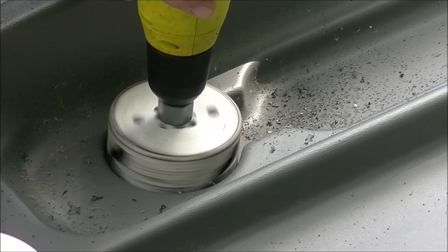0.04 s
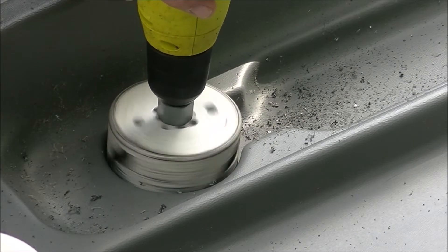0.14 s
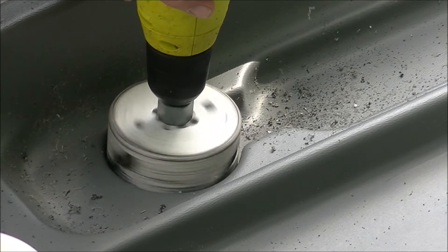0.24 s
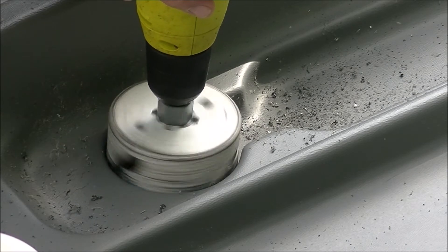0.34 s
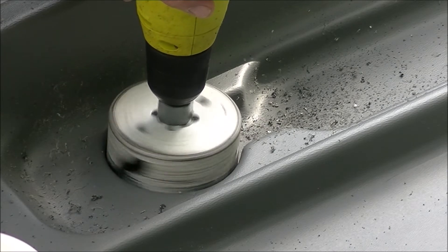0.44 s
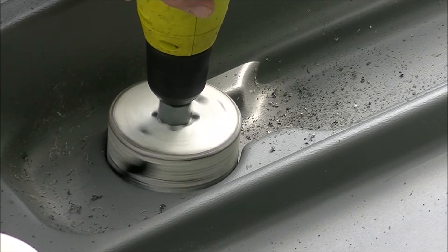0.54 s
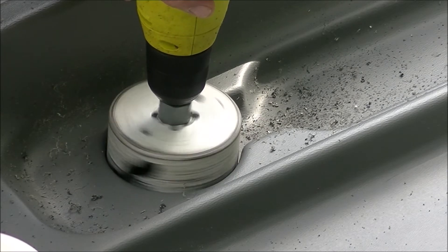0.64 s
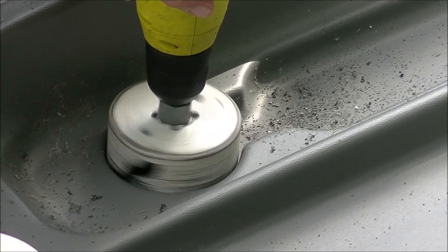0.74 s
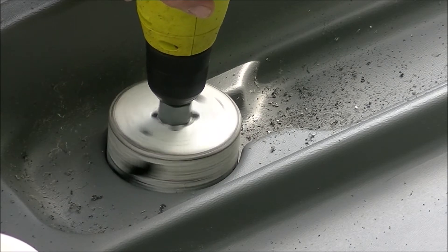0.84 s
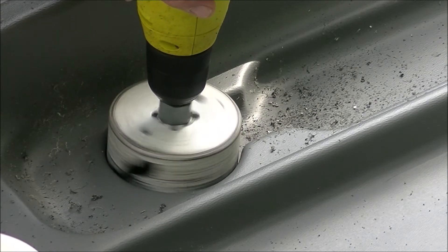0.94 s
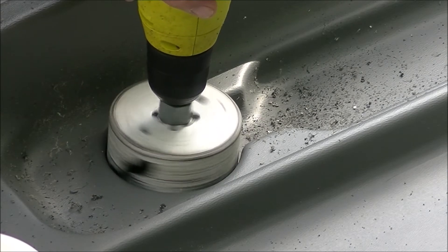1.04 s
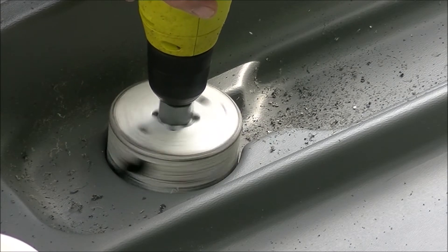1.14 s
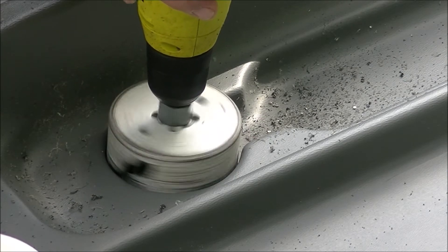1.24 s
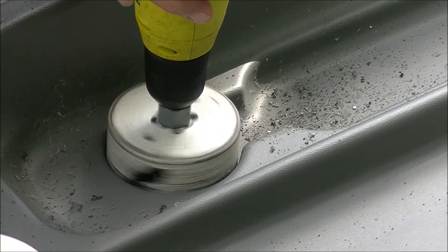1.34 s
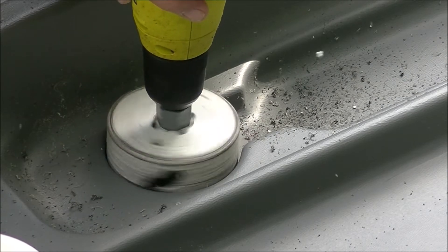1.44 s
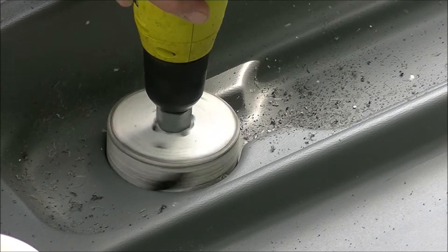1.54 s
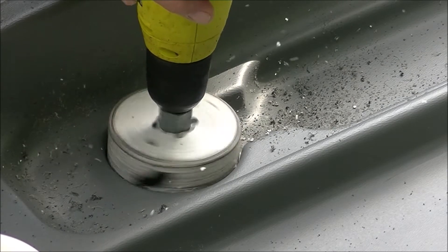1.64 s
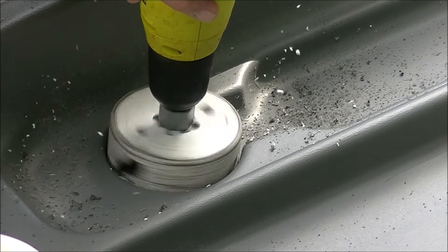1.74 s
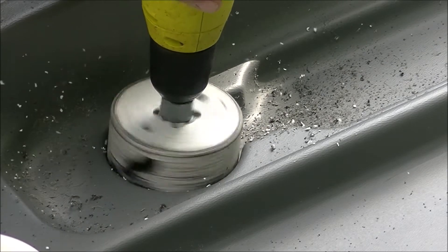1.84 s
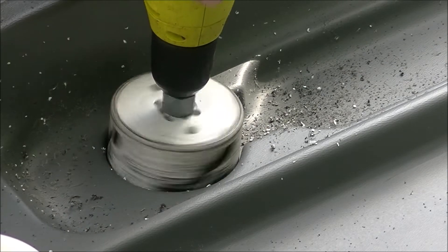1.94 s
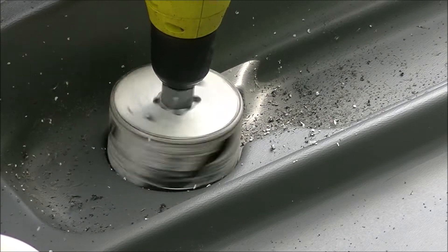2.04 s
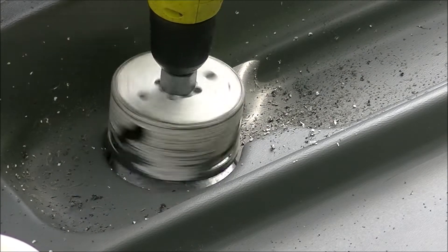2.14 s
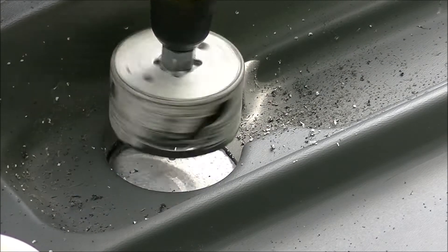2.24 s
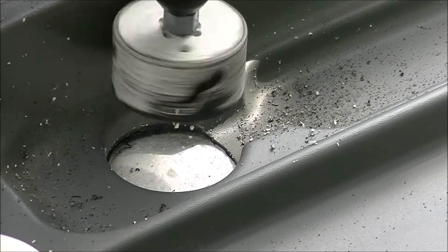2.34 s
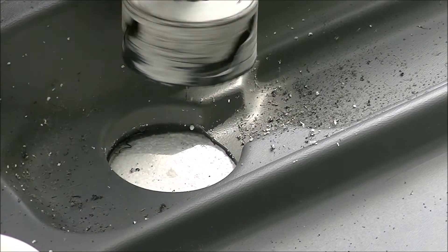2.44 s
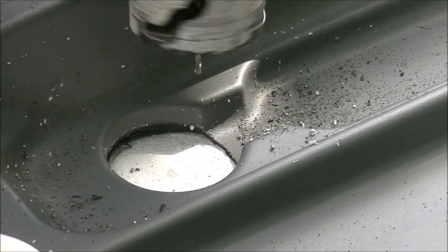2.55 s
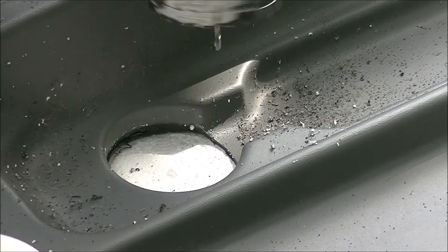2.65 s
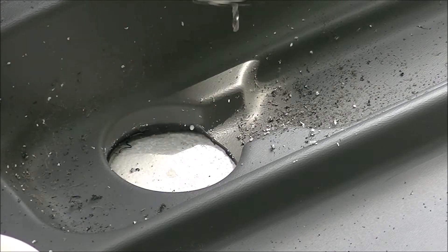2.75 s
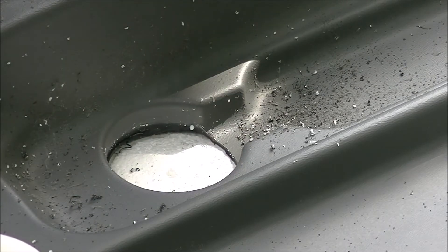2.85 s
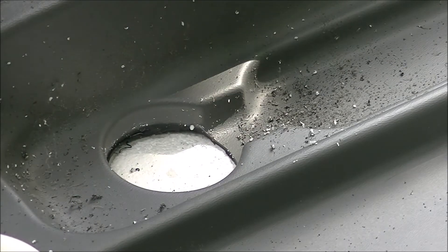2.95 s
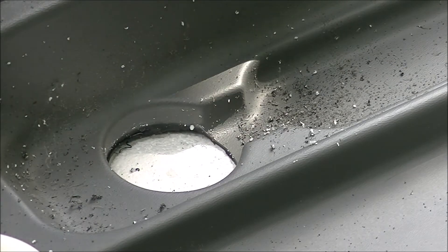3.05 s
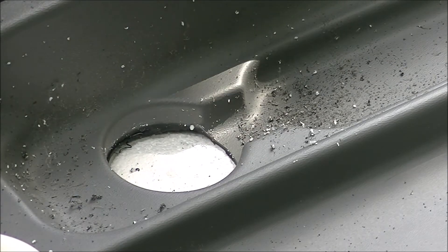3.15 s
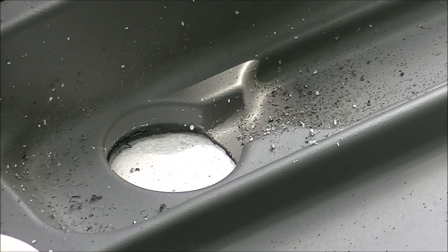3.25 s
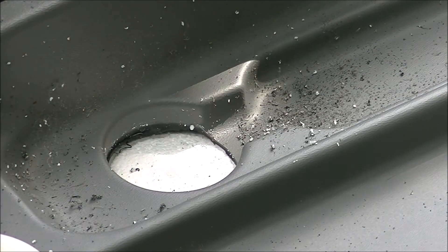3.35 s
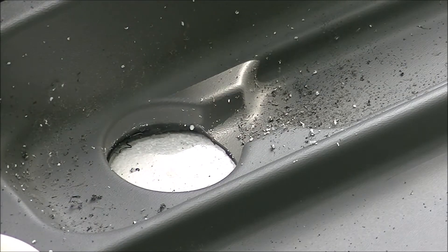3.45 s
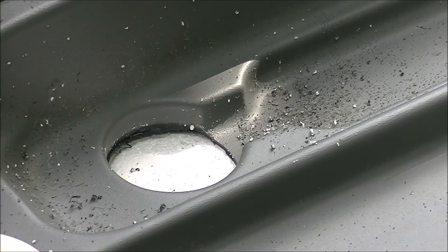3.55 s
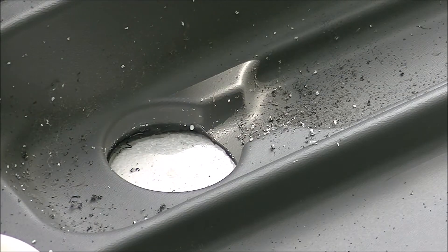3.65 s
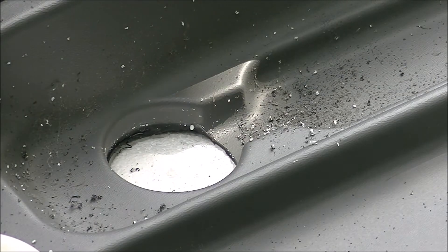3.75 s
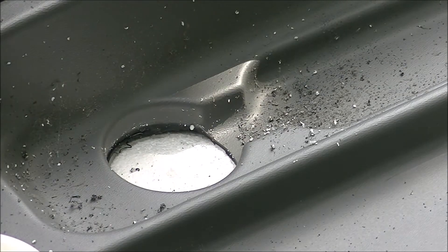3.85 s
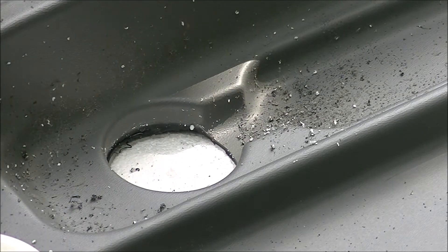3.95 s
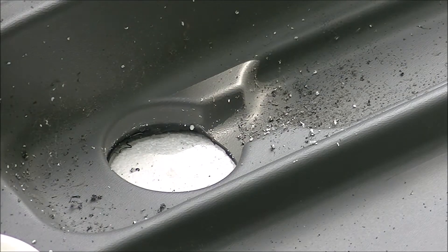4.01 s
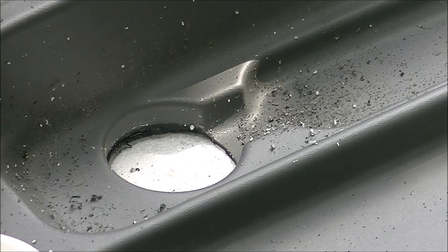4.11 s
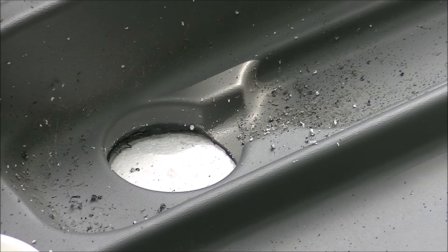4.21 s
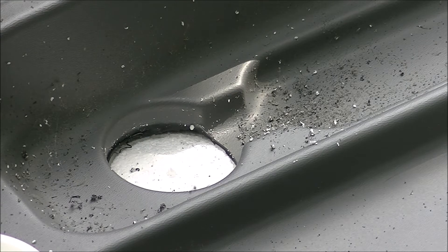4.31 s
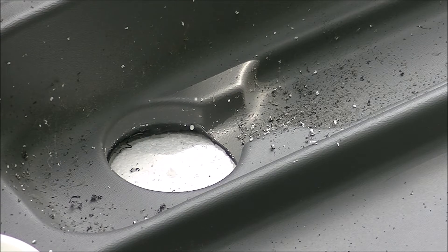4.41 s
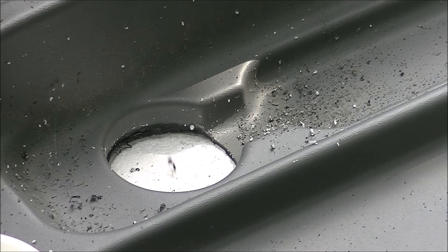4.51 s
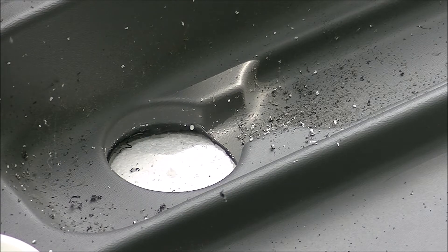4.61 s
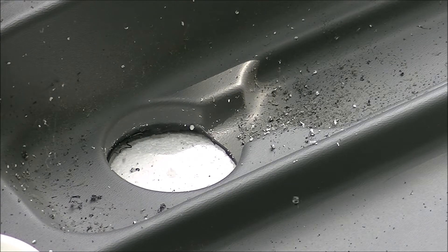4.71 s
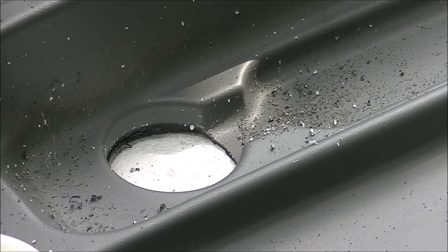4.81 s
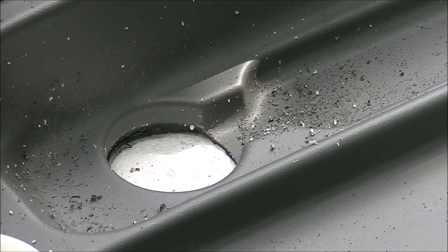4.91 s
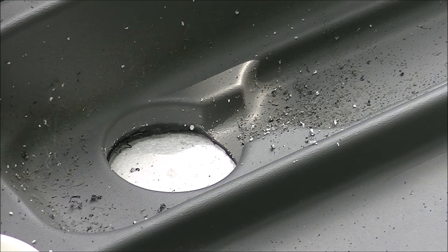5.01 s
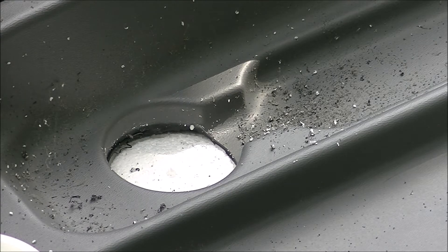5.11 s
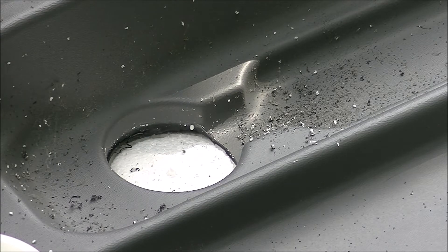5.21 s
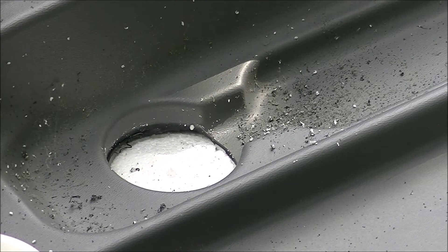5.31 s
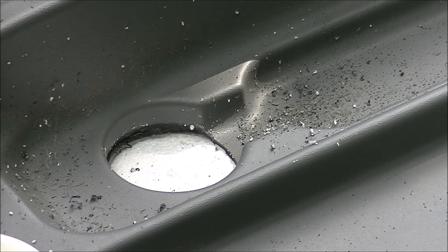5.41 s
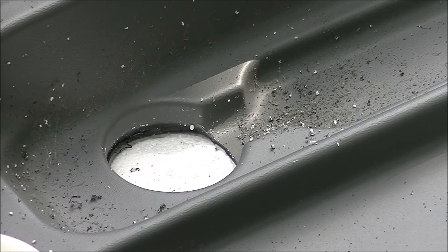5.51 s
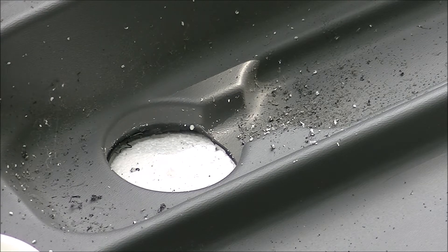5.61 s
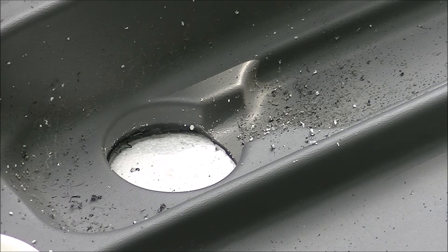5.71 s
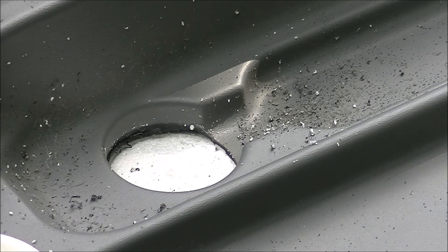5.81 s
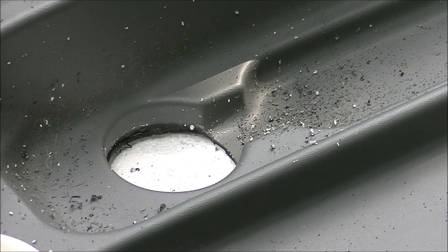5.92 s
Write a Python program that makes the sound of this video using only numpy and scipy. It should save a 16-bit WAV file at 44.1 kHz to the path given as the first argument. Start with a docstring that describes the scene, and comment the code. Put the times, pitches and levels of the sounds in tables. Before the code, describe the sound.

Rough, rhythmic hole-saw cutting in a plastic deck, a gliding motor wind-down, then small tool clatters and dull knocks outdoors.

```python
"""Hole saw in a plastic deck

Outdoors, a mains drill close to two microphones turns a hole saw in a hollow plastic deck, insects far behind.
Noise coloured by the housing and tones locked to the motor make the drill; a bite pattern that nearly repeats
each turn makes the saw. It breaks through, the trigger is let go, the saw is lifted out and the motor coasts
to a stop. Short damped partials make the snags on the rim and the clicks and bumps as the tool is put down."""
import sys
import numpy as np
from scipy import signal
from scipy.fft import rfft, irfft, next_fast_len
from scipy.io import wavfile
from scipy.ndimage import uniform_filter1d

SR = 44100
rng = np.random.default_rng(int(sys.argv[2]) if len(sys.argv) > 2 else 0)


def generate_wav(signal):
    """Clip the signal to [-1, 1] and save it as 16-bit WAV at the path in sys.argv[1]."""
    frames = np.transpose(np.atleast_2d(signal))
    scaled = np.clip(frames, -1, 1) * 32767
    pcm = np.round(scaled).astype(np.int16)
    wavfile.write(sys.argv[1], SR, pcm)


N = 263260
T = np.arange(N) / SR
M = next_fast_len(N + SR)   # padded FFT length
CUTOFF_HZ = 15676
BREAKTHROUGH_S, TRIGGER_OFF_S = 1.37, 1.75
FULL_SPEED = 420   # motor turns per s
GEAR_DOWN = 21   # motor turns per saw turn


def from_db(db):
    """Decibels to amplitude."""
    return 10 ** (np.asarray(db) / 20)


def rms_one(x):
    """Scale to an rms of 1."""
    return x / np.sqrt(np.mean(x ** 2) + 1e-20)


def in_time(rows):
    """Columns after the first as curves in time."""
    s, *columns = np.transpose(rows)
    return [np.interp(T, s, c) for c in columns]


def sounding(rows, fade_s=0.028):
    """One until the last row, then a short fade."""
    return np.clip(1 - (T - rows[-1][0]) / fade_s, 0, 1)


def at_hz(points):
    """A table read on the FFT grid, along log frequency."""
    hz, value = np.transpose(points)
    grid_hz = np.fft.rfftfreq(M, 1 / SR)
    return np.interp(np.log(grid_hz + 1), np.log(hz), value)


def colour(x, spectrum):
    """Filter to a spectrum; rms 1."""
    return rms_one(irfft(rfft(x, M) * from_db(at_hz(spectrum)), M)[:N])


def noise(spectrum):
    """Steady noise of a given colour; rms 1."""
    return colour(rng.standard_normal(N), spectrum)


def drift(rate_hz):
    """Slow chance made at every 40th sample by a double pole, spread 1."""
    r = np.exp(-80 * np.pi * rate_hz / SR)
    chance = rng.standard_normal(N // 40 + 1002)
    slow = signal.lfilter([1], [1, -2 * r, r * r], chance)[1000:]   # drop the filter's start
    return np.interp(np.arange(N) / 40, np.arange(len(slow)), rms_one(slow))


def octaves(speed):
    """Speed in octaves from full speed."""
    return np.log2(np.maximum(speed, 1) / FULL_SPEED)


# colour of the far insect chorus: (frequency [Hz], relative level [dB per Hz])
INSECT_COLOUR = [(1120, -38), (1900, -32), (2190, -18), (2770, -4.5), (3360, -3), (3450, -0.5), (4260, -3),
                 (5700, -2), (6680, -3.5), (8540, -18), (9740, -20), (15500, -29.5)]
# colour of the distant rumble: (frequency [Hz], relative level [dB per Hz])
AIR_COLOUR = [(12, -68), (20, -43), (208, -11), (235, -13.5), (300, -9.5), (361, -5.5), (736, -5.5),
              (1080, -5.5), (1350, -7.5), (1650, -10), (2600, -5.5), (3380, -26), (5720, -120)]
# faint steady tones: (frequency [Hz], level [dB])
HUM_TONES = [(141, -78), (242, -69), (1066, -68.5), (1125, -63)]
INSECTS_DB, AIR_DB = -40, -53.5   # levels they drift around


def outdoors():
    """A far insect chorus and distant rumble as coloured noise, and faint tones of drifting level."""
    insects = noise(INSECT_COLOUR) * from_db(INSECTS_DB + drift(2.0) / 2)
    air = noise(AIR_COLOUR) * from_db(AIR_DB + drift(18.0))
    hum = sum(from_db(db + 0.88 * drift(4.3)) * np.sin(2 * np.pi * hz * T) for hz, db in HUM_TONES)
    return insects + air + hum


# motor speed while powered and just after the trigger is let go: (time [s], speed [turns per s])
SPEED_CURVE = [(0, 416), (.6, 416), (.85, 420), (1.15, 421), (1.25, 419), (1.33, 409), (1.44, 406),
               (1.47, 413), (1.57, 419), (1.65, 432), (1.74, 442), (1.81, 421), (1.89, 392), (1.96, 368)]
# the coast: friction (turns per s^2), fan drag (per turn), standstill (s)
FRICTION, FAN_DRAG, STANDSTILL_S = 135.95, 7.69e-4, 4.184


def motor_speed():
    """Follows its curve through power-off, then slowed by steady friction and a drag that grows with speed
    squared."""
    left_s = np.clip(STANDSTILL_S - T, 0, 3)
    coast = np.sqrt(FRICTION / FAN_DRAG) * np.tan(np.sqrt(FRICTION * FAN_DRAG) * left_s)
    return np.where(T < SPEED_CURVE[-1][0], in_time(SPEED_CURVE)[0], coast)


# two hollows of the housing: (centre [Hz], width [Hz])
HOUSING_HOLLOWS = [(980, 230), (1480, 200)]
# they come and go as the lifted tool turns: (time [s], lower hollow [dB], upper hollow [dB])
HOLLOW_LEVELS = [(0.1, 0, -0.5), (1.9, -0.5, 1), (2.25, -1.5, 5), (2.4, 1.5, 4), (2.7, 4.5, -4.5),
                 (3.02, 2.5, 3), (3.08, -2.5, 5), (3.35, -1, 3.5), (3.55, -7, 1)]


def turned(x):
    """Each hollow is lifted or dimmed along its curve."""
    hz, spectrum = np.fft.rfftfreq(M, 1 / SR), rfft(x, M)
    out = x
    for (mid_hz, width_hz), db in zip(HOUSING_HOLLOWS, in_time(HOLLOW_LEVELS)):
        band = irfft(spectrum * np.exp(-((hz - mid_hz) / width_hz) ** 2), M)[:N]
        out = out + (from_db(db) - 1) * band
    return out


# colour of the housing rumble: (frequency [Hz], relative level [dB per Hz])
HOUSING_COLOUR = [(240, -48), (400, -20), (629, -13), (990, -0.5), (1340, 1.5), (1650, 3), (2290, 0.5),
                  (2510, -5.5), (3730, -16.5), (4730, -4), (6000, -7), (7800, -18.5), (13200, -120)]
# colour of the fan hiss: (frequency [Hz], relative level [dB per Hz])
HISS_COLOUR = [(1350, -31.5), (2300, -17), (2530, -7), (2740, -6.5), (2880, -1.5), (3830, -8.5), (4250, -3),
               (5150, -9), (5580, -4), (7100, -11), (7560, -13.5), (8520, -4), (10300, -3), (11900, -7),
               (15500, -21.5)]
RUMBLE_DB, RUMBLE_DB_PER_OCTAVE = -22, 10   # at full speed, and its fall with speed
HISS_DB, HISS_DB_PER_OCTAVE = -20.5, 7.5
STRAIN_S, STRAIN_LASTS_S, STRAIN_DB = 1.14, 0.15, 1   # at the hardest push rumble swells, hiss sags
LIFT_S, LIFT_TAKES_S, LIFT_HISS_DB = 1.82, 0.62, -4   # the drill is drawn away, the hiss dims
CRAWL_S, CRAWL_LASTS_S, CRAWL_DB = 3.72, .2, 3   # the hiss swells as the motor crawls
MAINS_HZ = 60


def motor(speed):
    """Housing rumble, and fan hiss that throbs at twice the mains while powered; both sink with speed."""
    strain_db = STRAIN_DB * np.exp(-((T - STRAIN_S) / STRAIN_LASTS_S) ** 2)
    lift_db = LIFT_HISS_DB * np.clip((T - LIFT_S) / LIFT_TAKES_S, 0, 1)
    crawl_db = CRAWL_DB * np.exp(-((T - CRAWL_S) / CRAWL_LASTS_S) ** 2)
    rumble_db = RUMBLE_DB + RUMBLE_DB_PER_OCTAVE * octaves(speed) + strain_db
    hiss_db = HISS_DB + HISS_DB_PER_OCTAVE * octaves(speed) - strain_db + lift_db + crawl_db
    throb = 1 + 0.11 * (T < TRIGGER_OFF_S) * np.sin(2 * np.pi * 2 * MAINS_HZ * T)
    rumble = noise(HOUSING_COLOUR) * from_db(rumble_db + drift(12.6))
    hiss = noise(HISS_COLOUR) * from_db(hiss_db + 0.77 * drift(11.0)) * throb
    return turned(rumble) + hiss


# gear whine under load: (time [s], level [dB])
WHINE_LEVEL = [(0, -26.5), (.5, -24.5), (.9, -22.5), (1.2, -23.5), (1.45, -24), (1.6, -27), (1.75, -34),
               (1.82, -42), (1.88, -32), (1.95, -32), (2.0, -45)]
# meshing lines: (order of the motor turn)
MESH_LINES = 5, 6.5, 7, 7.5, 12.5, 13, 13.5, 17
# each meshing line against the whine level: (level [dB])
MESH_LEVELS = [-11, -0.5, -15, -14, -21, -21, -6.5, -25]


def gears(turns):
    """Meshing lines locked to the motor turn, each wavering on its own."""
    lines = np.zeros(N)
    for order, db in zip(MESH_LINES, MESH_LEVELS):
        lines += from_db(db + drift(14)) * np.sin(2 * np.pi * (order * turns + rng.random()))
    return lines * from_db(in_time(WHINE_LEVEL)[0]) * sounding(WHINE_LEVEL)


# saw in the deck: (time [s], level [dB])
SAW_LEVEL = [(0, -25.5), (.9, -28), (1.15, -25), (1.27, -22.5), (1.5, -30), (1.65, -26), (1.85, -23.5),
             (2.0, -25), (2.18, -26.5), (2.22, -48), (2.3, -58)]
# colour of the deck round the groove: (frequency [Hz], relative level [dB per Hz])
DECK_COLOUR = [(53, -64), (90, -33), (120, -24), (160, -26), (200, -14), (237, -20), (396, -9), (501, -9),
               (547, -6), (580, -6), (633, -9.5), (825, -5.5), (1030, -8), (1250, -10.5), (1640, -6),
               (2480, -16), (2670, -7), (3000, -15), (3900, -30), (6600, -120)]
# colour of the rim of the open hole: (frequency [Hz], relative level [dB per Hz])
RIM_COLOUR = [(53, -61), (90, -26), (140, -26), (185, -3), (327, -7), (479, 6), (615, -1), (672, 4.5),
              (734, -9), (813, 10), (901, -27), (1040, -30), (1190, -17), (1640, 5.5), (3000, -20),
              (3900, -35), (6600, -120)]
# teeth that bite harder, or softer if below 0 dB: (place in the turn [0-1], width [turns], level [dB])
PROUD_TEETH = [(.26, .04, 4), (.52, .03, 5), (.74, .04, 3), (.12, .07, -8)]
KEPT_CUTTING, KEPT_OPEN = 0.904, 0.56   # groove kept from turn to turn, before and after breakthrough


def saw(turns):
    """Each turn the teeth meet nearly the groove of the turn before: the bites repeat and slowly change."""
    open_hole = np.clip((T - BREAKTHROUGH_S) / 0.18, 0, 1)
    kept = KEPT_CUTTING + (KEPT_OPEN - KEPT_CUTTING) * open_hole
    saw_turns, places = turns / GEAR_DOWN, 1024
    place = np.arange(places) / places
    tooth_db = sum(db * np.exp(-((place - at) / width) ** 2 / 2) for at, width, db in PROUD_TEETH)
    grain = from_db(np.minimum(rng.exponential(1, places), 4))
    groove = rng.standard_normal((int(saw_turns[-1]) + 2, places))
    for k in range(1, len(groove)):
        share = np.clip(np.interp(k, saw_turns, kept), 0, .99)
        groove[k] = share * groove[k - 1] + np.sqrt(1 - share ** 2) * groove[k]
    pattern = (groove * from_db(tooth_db) * grain).ravel()
    bites = np.interp(saw_turns * places, np.arange(groove.size), pattern)
    end_s = SAW_LEVEL[-1][0]
    bites *= T < end_s
    body = np.sqrt(1 - open_hole) * colour(bites, DECK_COLOUR) + np.sqrt(open_hole) * colour(bites, RIM_COLOUR)
    body *= np.sqrt(end_s * SR / N)   # rms 1 over the sawing rather than the whole scene
    return body * from_db(in_time(SAW_LEVEL)[0]) * sounding(SAW_LEVEL)


# steady notes of the turning saw: (start [s], end [s], order of the saw turn, level [dB])
STEADY_NOTES = [(0, 1.2, 20, -46), (0, 1.0, 26, -43), (0, 1.2, 30, -35), (0, 1.2, 7, -58),
                (0, 1.15, 41, -44), (0, .2, 49, -33), (0, .82, 48, -32), (.2, .6, 56, -39),
                (1.27, 1.44, 19, -33), (1.26, 1.44, 28, -34), (1.3, 1.44, 31, -36), (1.55, 1.8, 9, -47)]


def saw_notes(turns):
    """Some orders of the saw turn stand out while the deck resonates with them."""
    out = np.zeros(N)
    from_proudest = turns / GEAR_DOWN - PROUD_TEETH[1][0]   # crests meet at the proudest tooth
    for start, end, order, db in STEADY_NOTES:
        gate = np.clip(np.minimum(T - start + 0.025, end - T) / 0.029, 0, 1)
        out += gate * from_db(db + 2.0 * drift(11.0)) * np.cos(2 * np.pi * order * from_proudest)
    return out


# hard bites in each turn: (place in the turn [0-1], width [turns], order of the saw turn, level [dB])
BITE_PLACES = [(.255, .032, 42, -17.5), (.51, .022, 36, -16.5), (.57, .035, 49, -26), (.75, .03, 58, -24),
               (.22, .025, 67, -27), (.36, .04, 22, -31)]


def hard_bites(turns):
    """Short knocks at fixed places in the saw turn, fading out at breakthrough."""
    out = np.zeros(N)
    for place, width, order, db in BITE_PLACES:
        apart = (turns / GEAR_DOWN - place + .5) % 1 - .5   # turns from the bite
        window = np.exp(-(apart / width) ** 2 / 2)
        out += from_db(db + drift(3.0)) * window * np.cos(2 * np.pi * order * apart)
    return out * np.clip((BREAKTHROUGH_S - T) / 0.18, 0, 1)


def band_pass(x, low_hz, high_hz):
    """Keep a band."""
    return signal.sosfilt(signal.butter(2, [low_hz, high_hz], "band", fs=SR, output="sos"), x)


def blows(rows, t60, crack_db, under_db, over_db, noise_db):
    """Each blow: a few damped partials round its pitch, a rattle of noise near it and a bright crack."""
    out, t = np.zeros(N + SR), np.arange(SR // 16) / SR
    chance = rng.standard_normal((len(rows), len(t)))
    bright = band_pass(chance, 3000, 11500)
    ratios = [(.62, from_db(under_db)), (1, 0.92), (1.45, 0.25), (2.15, from_db(over_db))]
    rise = 1 - np.exp(-(t / .0008) ** 2)
    for (s, db, hz), z, crack in zip(rows, chance, bright):
        partials = sum(gain * np.sin(2 * np.pi * hz * ratio * t)
                       for ratio, gain in ratios if hz * ratio < CUTOFF_HZ)
        near = rms_one(band_pass(z, hz * .7, min(hz * 2, CUTOFF_HZ)))
        hit = (partials + from_db(noise_db) * near) * from_db(-60 * t / max(t60, .003))
        hit += from_db(crack_db - 60 * t / .012) * crack
        out[round(s * SR):][:len(t)] += from_db(db) * rise * hit
    return signal.sosfilt(signal.butter(3, 310, "high", fs=SR, output="sos"), out[:N])


# saw snags on the rim: (time [s], strength [dB], pitch [Hz])
RIM_SNAGS = [(1.422, -14, 814), (1.637, -23, 480), (1.686, -24, 810), (1.768, -21, 474), (1.785, -20, 500),
             (1.83, -21, 500), (1.874, -18, 395), (1.942, -17, 450), (1.997, -22, 422), (2.032, -17, 806),
             (2.049, -19.5, 560), (2.069, -15, 980), (2.116, -19, 1790), (2.117, -23, 3300),
             (2.119, -16.5, 475), (2.172, -19, 818), (2.176, -19, 1990), (2.177, -21, 3300)]
# their ring: (60 dB decay [s], crack [dB], lower partial [dB], upper partial [dB], noise [dB])
RIM_SNAG_RING = (0.04, -14, -8, -9, 1)


def snags():
    """The saw catches the rim and the plastic rings briefly."""
    return blows(RIM_SNAGS, *RIM_SNAG_RING)


# armature tones, slots and coil pairs lead: (order of the motor turn, level before the casing [dB])
ARMATURE_TONES = [(9, -45), (10, -49), (11, -55), (12, -42), (13, -52), (14, -56), (15, -61), (16, -58),
                  (17, -55), (18, -55), (19, -55), (20, -55), (21, -57), (22, -59), (23, -53), (24, -44),
                  (25, -54), (26, -57), (27, -55), (28, -61), (29, -55), (30, -52), (31, -54), (32, -57),
                  (33, -57), (34, -58), (35, -54), (36, -50), (37, -48), (38, -53), (40, -55), (41, -57),
                  (42, -52), (43, -55), (44, -53), (45, -58), (46, -55), (47, -51), (48, -47), (49, -57),
                  (50, -55), (51, -55), (52, -60), (53, -56), (54, -52), (55, -52), (56, -56), (57, -55),
                  (58, -57), (59, -52), (60, -47), (61, -54), (62, -53), (63, -54), (64, -54), (65, -56),
                  (66, -51), (67, -52), (68, -58), (69, -58), (70, -58), (71, -56), (72, -50), (73, -55),
                  (74, -54), (75, -57), (76, -57), (77, -59), (78, -52), (79, -56), (80, -62), (81, -60),
                  (82, -57), (83, -55), (84, -52), (85, -57), (87, -57), (88, -58), (89, -60), (90, -57),
                  (91, -55), (93, -59), (94, -57), (95, -62), (96, -55), (98, -59), (101, -60), (102, -56),
                  (104, -60), (105, -62), (106, -60), (108, -55), (109, -58), (110, -59)]
# how the casing lets a tone out: (frequency [Hz], gain [dB])
CASING_GAIN = [(800, -16), (1200, -4), (1500, 2), (1900, -1), (2300, 4), (2800, 1), (3300, 2), (3800, 2),
               (4400, 5), (5000, 1), (5700, 0), (6400, -1), (7200, -3), (8200, 4), (9200, 7), (10300, 4),
               (11500, 2), (13000, -4), (15200, -9)]
# some tones swell or dip for a moment: (order, time [s], half length [s], change [dB])
TONE_SWELLS = [(12, 2.1, .3, 5), (24, 3.15, .1, -5), (24, 2.6, .06, -5), (48, 2.82, .03, -4),
               (60, 3.18, .03, -4), (66, 3.2, .06, 5), (12, 3.4, .15, -2), (14, 3.42, .06, 9),
               (10, 2.95, .2, 4), (23, 2.55, .2, 8), (36, 3.45, .15, 7), (9, 3.3, .4, -6),
               (18, 2.3, .25, 7), (24, 3.42, .14, 4), (24, 2.9, .12, 2), (30, 2.3, .06, 7),
               (30, 3.1, .09, 9), (36, 2.25, .2, 8), (37, 3.0, .1, 7), (37, 3.35, .1, 4),
               (37, 2.5, .15, -5), (48, 2.72, .05, 6), (48, 2.92, .08, 4), (54, 2.98, .07, 11),
               (55, 2.98, .06, 5), (60, 3.1, .06, 7), (60, 3.25, .06, 6)]
# gain of the armature tones while coasting: (time [s], gain [dB])
COASTING_GAIN = [(1.85, 5), (2.1, 2), (2.4, 3), (2.7, 2), (2.9, 1), (3.1, 0), (3.3, -3), (3.5, -3),
                 (3.7, -12)]
FAN_BLADES, BLADE_DB, BLADE_DB_PER_OCTAVE = 39, -36, 9   # blade tone at full speed, and its fall
WHISTLE_RISE_S = .12   # from power off


def whistles(turns, speed):
    """Orders glide down with the motor and swell across the casing resonances; the fan blades sing too."""
    out = np.zeros(N)
    on = slice(round(TRIGGER_OFF_S * SR), round(COASTING_GAIN[-1][0] * SR) + 2000)
    hz, casing_db = np.transpose(CASING_GAIN)
    for order, db in ARMATURE_TONES:
        pitch_hz = order * speed[on]
        level_db = db + np.interp(np.log(pitch_hz + 1), np.log(hz), casing_db) + 2.5 * drift(25)[on]
        for swelling, s, half_s, swell_db in TONE_SWELLS:
            if swelling == order:
                level_db += swell_db * np.exp(-((T[on] - s) / half_s) ** 2)
        tone = np.sin(2 * np.pi * (order * turns[on] + rng.random()))
        out[on] += from_db(level_db) * (pitch_hz < CUTOFF_HZ) * tone
    out *= from_db(in_time(COASTING_GAIN)[0])
    blade_db = BLADE_DB + BLADE_DB_PER_OCTAVE * octaves(speed) + 2 * drift(5.5)
    out += from_db(blade_db) * np.sin(2 * np.pi * FAN_BLADES * turns)
    return out * np.clip((T - TRIGGER_OFF_S) / WHISTLE_RISE_S, 0, 1) * sounding(COASTING_GAIN)


# tool parts click and knock: (time [s], strength [dB], pitch [Hz])
TOOL_KNOCKS = [(3.337, -24, 1680), (3.618, -34, 1540), (3.668, -33, 1900), (3.688, -31, 1700),
               (3.697, -31, 2600), (3.706, -33, 2700), (3.719, -29, 1300), (3.724, -33, 4600),
               (3.745, -22, 1500), (3.748, -19, 2000), (3.7505, -21, 3100), (3.752, -23, 1600),
               (3.76, -24, 2370), (3.819, -31, 1500), (3.8225, -22.5, 1350), (3.8245, -31, 4600),
               (3.826, -29, 1900), (3.876, -29, 1590), (4.018, -38, 1400), (4.034, -33, 1000),
               (4.047, -26, 2900), (4.0485, -9, 2800), (4.0495, -22, 4700), (4.051, -17, 1500),
               (4.053, -20, 2300), (4.061, -25, 2800), (4.062, -28, 1200), (4.066, -25, 2500),
               (4.069, -27, 1400), (4.175, -37, 1300)]
# their ring: (60 dB decay [s], crack [dB], lower partial [dB], upper partial [dB], noise [dB])
TOOL_KNOCK_RING = (0.017, -16, -8, -17.5, -4)


def knocks():
    """Parts of the tool strike each other and ring very shortly."""
    return blows(TOOL_KNOCKS, *TOOL_KNOCK_RING)


# loose parts rattle as the tool is handled: (time [s], middle strength [dB])
HANDLING = [(3.57, -54), (3.62, -40), (3.72, -37), (3.77, -43), (3.82, -47), (3.9, -46), (3.99, -51),
            (4.04, -46), (4.1, -49), (4.15, -56), (4.2, -66), (5.05, -68), (5.15, -54), (5.35, -56),
            (5.58, -58), (5.65, -68), (5.97, -62)]
# their ring: (60 dB decay [s], crack [dB], lower partial [dB], upper partial [dB], noise [dB])
LOOSE_RING = (0.05, -8, -22, -14, 1)
RATTLE_COUNT, RATTLE_SPREAD_DB = 760, 3   # spread to either side
RATTLE_LOW_HZ, RATTLE_HIGH_HZ = 1000, 2600


def rattle():
    """Small knocks at random times and pitches, as strong as the handling."""
    when, pitch, size = rng.random((RATTLE_COUNT, 3)).T
    times, level_db = np.transpose(HANDLING)
    s = times[0] + when * (T[-1] - times[0])
    db = np.interp(s, times, level_db) + RATTLE_SPREAD_DB * (2 * size - 1)
    hz = RATTLE_LOW_HZ * (RATTLE_HIGH_HZ / RATTLE_LOW_HZ) ** pitch
    return blows(np.transpose([s, db, hz]), *LOOSE_RING)


# faint high ticks: (time [s], strength [dB], pitch [Hz])
HIGH_TICKS = [(4.0655, -28, 8000), (5.0424, -28, 9720), (5.1612, -32, 13700), (5.1761, -27, 9500),
              (5.3028, -39, 8340), (5.3294, -35, 8110)]
# their ring: (60 dB decay [s], crack [dB], lower partial [dB], upper partial [dB], noise [dB])
HIGH_TICK_RING = .0075, -4, -20, -20, -2


def ticks():
    """Faint high ticks, gone within milliseconds."""
    return blows(HIGH_TICKS, *HIGH_TICK_RING)


# dull bumps on the hull: (time [s], strength [dB], pitch [Hz])
HULL_BUMPS = [(4.583, -38, 900), (4.825, -31, 1650), (4.826, -35, 950), (5.032, -39, 2060),
              (5.121, -25, 600), (5.1215, -23, 1050), (5.346, -35, 1400), (5.476, -37, 1000),
              (5.522, -29, 1300), (5.523, -31, 2200), (5.644, -34, 700), (5.645, -37, 1600),
              (5.658, -37, 1500), (5.829, -40, 600), (5.9125, -11.5, 780), (5.913, -28, 1750),
              (5.918, -28, 800), (5.929, -32, 1300), (5.938, -35, 800), (5.9494, -14, 680),
              (5.9496, -17, 1650), (5.955, -29, 800), (5.963, -35, 650)]
# their ring: (60 dB decay [s], crack [dB], lower partial [dB], upper partial [dB], noise [dB])
HULL_BUMP_RING = .012, -40, -14, -24, -12


def bumps():
    """The tool bumps on the hull: low, quickly damped and almost without crack."""
    return blows(HULL_BUMPS, *HULL_BUMP_RING)


def pair(x, likeness, tilt_db, spread_s):
    """Two microphones: a shared part, and an opposed part smeared by reflections of even colour."""
    t = np.arange(SR // 2) / SR
    smear = rfft(rng.standard_normal(len(t)) * np.exp(-t / spread_s), M)
    smear = smear / np.sqrt(uniform_filter1d(np.abs(smear) ** 2, size=M // 200))
    alike = np.clip(at_hz(likeness), 0, 1)
    left_right = np.array([[1], [-1]])
    shared = np.sqrt((1 + alike) / 2)
    opposed = smear * np.sqrt((1 - alike) / 2) * left_right
    tilt = from_db(at_hz(tilt_db) / 2 * left_right)
    return irfft(rfft(x, M) * (shared + opposed) * tilt, M)[:, :N]


# likeness of the two microphones for the close drill: (frequency [Hz], likeness [0-1])
NEAR_LIKENESS = [(60, 0.97), (150, 0.92), (380, 0.92), (950, 0.89), (2380, 1), (4400, 0.86), (8500, 0.88),
                 (15000, 0.66)]
# and for the surroundings: (frequency [Hz], likeness [0-1])
FAR_LIKENESS = [(60, 0.45), (180, 0.4), (550, 0.091), (1650, 0.63), (4970, 0.67), (15000, 0.047)]
# balance of the drill: (frequency [Hz], left minus right [dB])
NEAR_BALANCE = [(60, 0.0), (110, -0.5), (200, -4.0), (380, -4.0), (700, -4.0), (1290, -2.0), (2380, -0.5),
                (4400, -1.5), (8120, -1.0), (15000, -0.5)]
# balance of the surroundings: (frequency [Hz], left minus right [dB])
FAR_BALANCE = [(60, -1.0), (110, -3.0), (200, -3.5), (380, -2.5), (700, -1.5), (1290, -1.5), (2380, -0.5),
               (4400, -1.0), (8120, -1.5), (15000, -0.5)]


def scene():
    """The drill close by, the surroundings behind."""
    speed = motor_speed()
    turns = np.cumsum(speed) / SR
    drill = motor(speed) + gears(turns) + saw(turns) + saw_notes(turns) + hard_bites(turns)
    drill += whistles(turns, speed)
    hits = snags() + knocks() + rattle() + ticks() + bumps()
    return (pair(outdoors(), FAR_LIKENESS, FAR_BALANCE, spread_s=0.052)
            + pair(drill, NEAR_LIKENESS, NEAR_BALANCE, spread_s=0.05)
            + pair(hits, NEAR_LIKENESS, NEAR_BALANCE, spread_s=0.006))


def record(dry):
    """The top is cut steeply."""
    return signal.sosfilt(signal.cheby2(14, 60, CUTOFF_HZ * 1.01, fs=SR, output="sos"), dry)


dry = scene()
out = record(dry)
generate_wav(out)
```